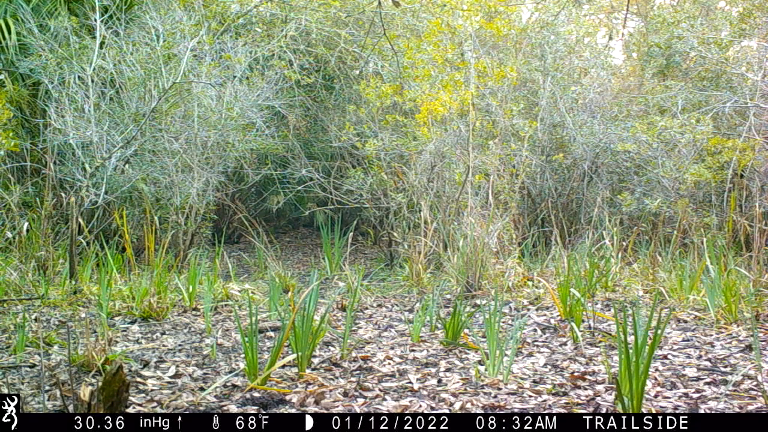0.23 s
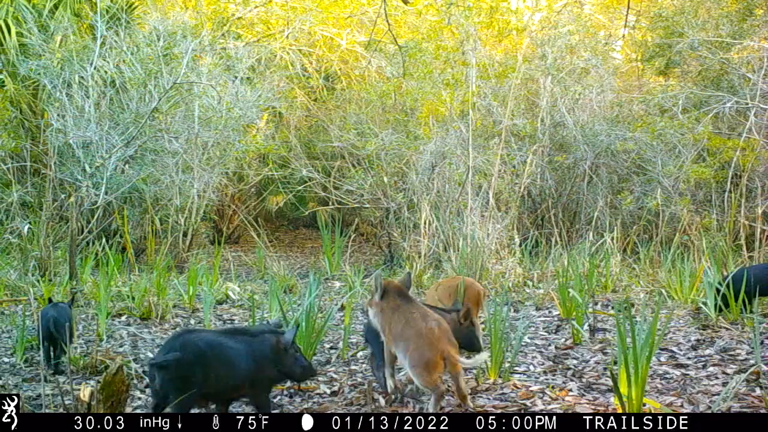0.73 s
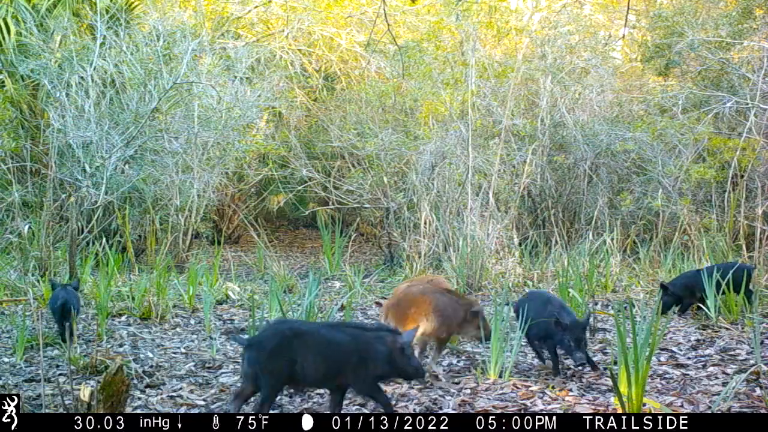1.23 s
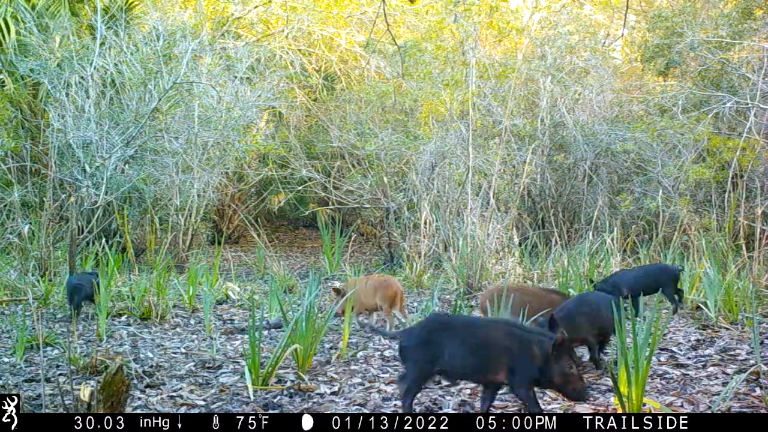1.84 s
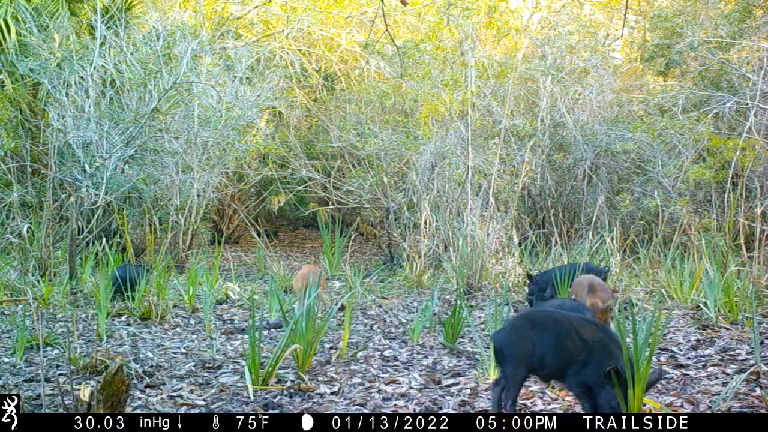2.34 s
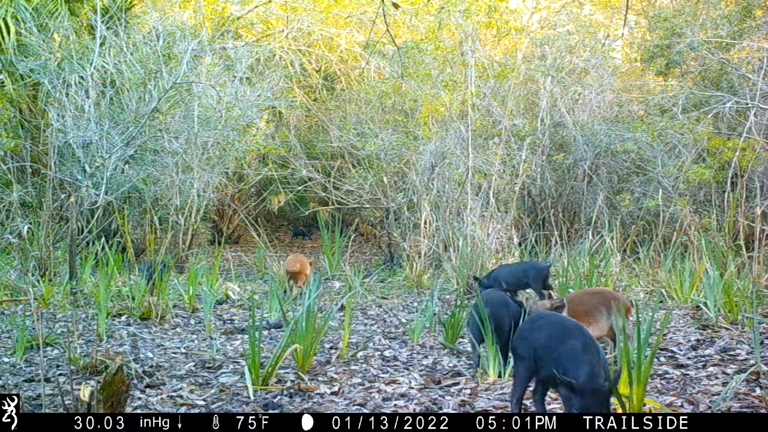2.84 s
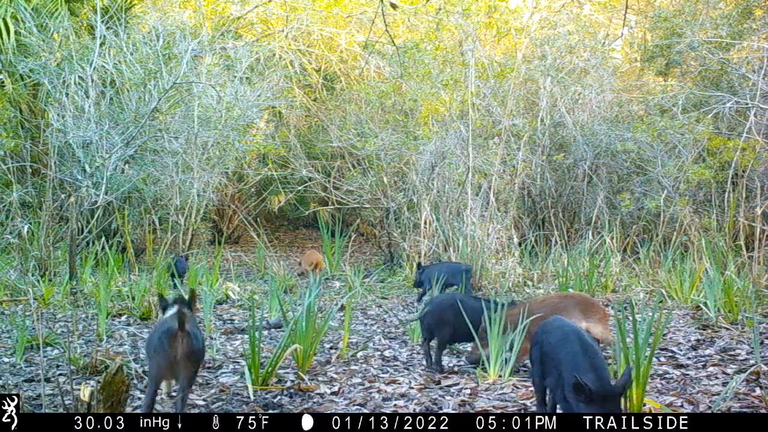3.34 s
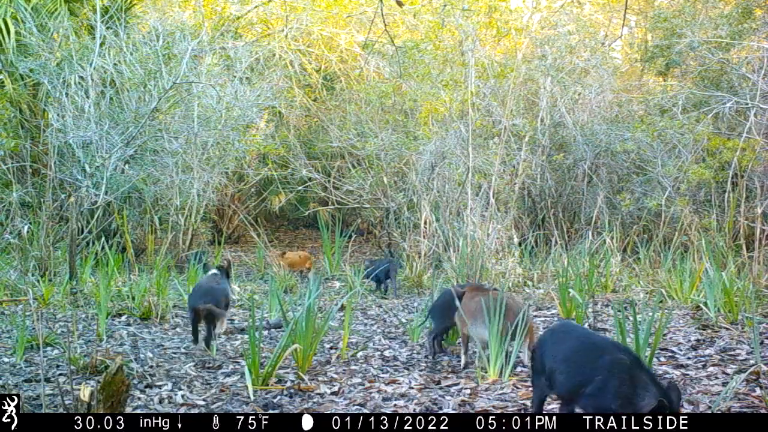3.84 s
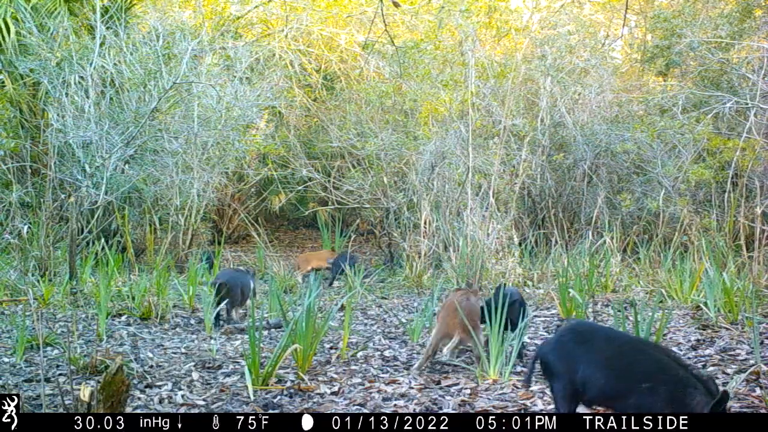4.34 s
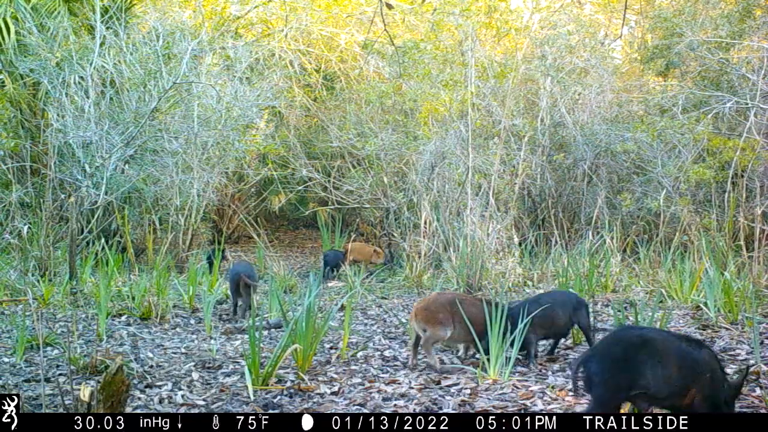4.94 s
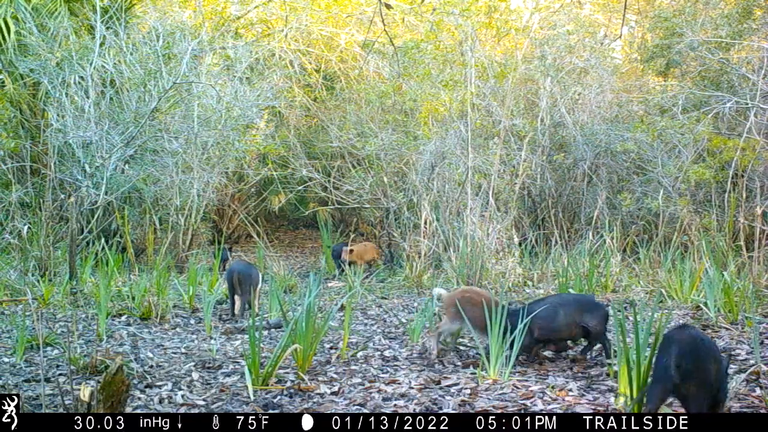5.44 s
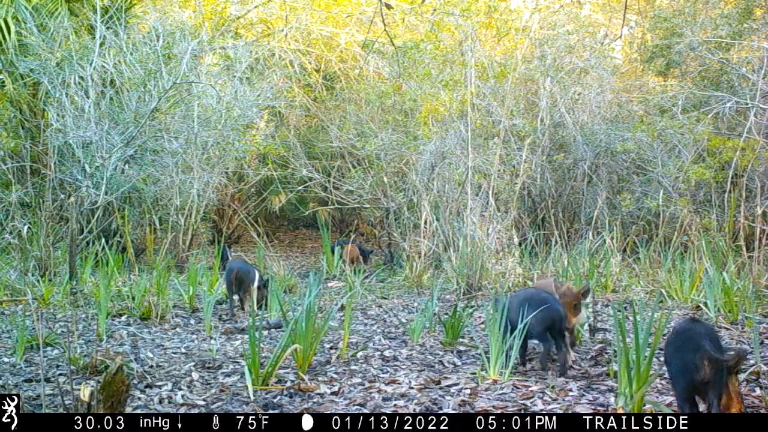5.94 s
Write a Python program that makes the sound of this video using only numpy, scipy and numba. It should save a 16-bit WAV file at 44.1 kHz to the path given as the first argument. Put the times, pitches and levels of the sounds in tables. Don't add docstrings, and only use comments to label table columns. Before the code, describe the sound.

A pig treads quickly through dry leaves, crackling and snapping twigs, with a short, soft, low grunt. An abrupt cut brings another pig's heavier crunching close by, peaking in a sharp twig snap. The steps then become softer and more distant, with small flakes breaking. Outdoors in a woodland clearing; a small boxed microphone gives a coloured, muffled mono sound with faint hiss.

```python
import sys
import numpy as np
from scipy import signal
from scipy.io import wavfile
from scipy.ndimage import uniform_filter1d
from numba import njit

SR = 44100
rng = np.random.default_rng(int(sys.argv[2]) if len(sys.argv) > 2 else 0)


def elevation(decibels):
    levels = np.asarray(decibels, float)
    return 10 ** (levels / 20)


def store_pcm(level_fs):
    pcm = np.round(np.clip(level_fs, -1, 1) * 32767).astype(np.int16)
    wavfile.write(sys.argv[1], SR, np.atleast_2d(pcm).T)


N = 273420


def evened(x):
    return x / np.sqrt(np.mean(x ** 2) + 1e-20)


def resonate(x, hz, width_hz):
    return signal.lfilter(*signal.iirpeak(hz, hz / width_hz, SR), x)


def low_passed(x, hz):
    return signal.lfilter(*signal.butter(1, hz, fs=SR), x)


def slow(points, axis, shape):
    return evened(uniform_filter1d(rng.standard_normal(shape), max(int(points), 1), axis=axis))


def thin(x, low_share):
    return x - (1 - low_share) * low_passed(x, 1800)


def strike(rows, shape):
    length = 4000
    out, t = np.zeros(N + length), np.arange(length) / SR
    for start, level_db, *pitch in rows:
        noise = rng.standard_normal(length)
        out[round(start * SR):][:length] += elevation(level_db) * shape(t, noise, *pitch)
    return out[:N]


def crackle():
    clumps = elevation(1.5 * slow(300, 0, N))
    sign = rng.choice([-1., 1.], N)
    size = elevation(3.4 * np.minimum(rng.exponential(1, N), 5)) * sign
    clicks = clumps * size * (rng.random(N) < 7000 / SR)
    kind, rings = rng.integers(0, 12, N), np.zeros(N)
    for k, hz in enumerate(np.geomspace(600, 9000, 12)):
        rings += resonate(clicks * (kind == k), hz, 0.24 * hz)
    flakes = size * (rng.random(N) < 70 / SR)
    brittle = 9 * np.diff(flakes, n=2, prepend=[0, 0]) / size.std()
    rustle = 0.75 * clumps * rng.standard_normal(N)
    return 0.1 * brittle + evened(evened(clicks) + 0.61 * evened(rings) + rustle)


# [t/s, leaf crush level/dB]
HERD_SHUFFLE = [(0, -35.5), (.2, -36), (.4, -48), (.77, -43), (.78, -33), (1.3, -33), (1.63, -35.5),
                (1.95, -35), (2.6, -31.5), (3.1, -33), (3.3, -37), (4.0, -38.5), (4.45, -42.5),
                (5.0, -38.5), (5.6, -41), (6.0, -42), (6.04, -51), (6.2, -47)]
# [start t/s, hold t/s, crush level/dB, litter depth level/dB, leaf stiffness level/dB]
LONE_TREADS = [
    (0, 0.071, -23.5, -7.5, 2),
    (.1, 0.02, -30.5, -12.5, 11.5),
    (.19, 0.023, -24.5, -10, 7.5),
    (.225, 0.055, -32.5, -8, 5),
    (.288, 0.032, -30, -13, 15),
    (.335, 0.023, -32, -5, 9.5),
    (.455, 0.039, -30, -3, 3.5),
    (.547, 0.08, -30, -6.5, 6),
    (.72, 0.075, -37.5, -1, 0),
]
# [start t/s, hold t/s, crush level/dB, depth level/dB, stiffness level/dB]
NEAR_TREADS = [(.788, 0.021, -27.5, -6.5, -8), (0.837, 0.02, -26.5, -8, 5),
               (0.885, 0.046, -25.5, 1.5, -4.5), (0.972, 0.045, -25, -7, -3), (1.157, 0.065, -21, -4, -4.5),
               (1.177, 0.079, -19, -3, -5), (1.363, 0.023, -38, -8, -9), (1.413, 0.18, -37, -5, -8),
               (1.668, 0.043, -24, -8.5, -2), (1.757, 0.097, -21.5, -4, -2),
               (1.995, 0.081, -27.5, -10.5, 5.5), (2.049, 0.082, -27, -2.5, 3.5),
               (2.194, 0.047, -28.5, -8, 4), (2.269, 0.077, -30.5, -4, -2.5),
               (2.318, 0.046, -18, -13.5, -4.5), (2.433, 0.049, -24.5, -10, 6.5),
               (2.505, 0.018, -23, -7.5, 1.5), (2.674, 0.16, -15.5, -7, 2), (2.828, 0.06, -25.5, -15, 5.5),
               (2.871, 0.044, -16.5, -7, 0), (2.937, 0.14, -28.5, -11, 9.5), (3.108, 0.057, -26, -5.5, 7),
               (3.172, 0.081, -32.5, -8, 9), (3.229, 0.045, -26.5, -7.5, 8.5)]
# [start t/s, hold t/s, crush level/dB, depth level/dB, stiffness level/dB]
FAR_TREADS = [(3.385, 0.011, -29.5, -5.5, 6), (3.434, 0.042, -29.5, -6, -1), (3.506, 0.064, -31, -2.5, 0),
              (3.57, 0.11, -37, 2, 3), (3.697, .16, -41, 1, 4), (3.995, .06, -36.5, 0, 5),
              (4.125, 0.028, -35.5, -0.5, -3), (4.196, .05, -39, -1, -1), (4.266, 0.1, -38, 1, 3),
              (4.506, 0.088, -37.5, -1, -1), (4.633, 0.083, -38, -1, -4), (4.82, 0.032, -44, -10, -4),
              (5.022, 0.051, -28, -8.5, 1), (5.08, 0.062, -40.5, -2, 6), (5.21, 0.014, -42, 9, -2),
              (5.26, 0.024, -36, -1.5, -5), (5.348, 0.018, -35, 0.5, 1.5), (5.405, 0.052, -33, -3, -2),
              (5.449, 0.024, -31, 2.5, -5), (5.507, 0.022, -35.5, -3, 4), (5.658, 0.052, -30.5, -4.5, -4),
              (5.72, 0.028, -32, -6, 0.5), (5.79, 0.046, -38.5, 7, 10), (5.883, 0.21, -41, 3, 6)]
HERD_DEPTH_DB = -0.5
PRESS_S, SETTLE_DB_PER_S = 0.0067, 331
ARCH_DB = 3.5


def treads(t):
    power = elevation(np.interp(t, *np.transpose(HERD_SHUFFLE))) ** 2
    stiff, deep = 0 * power, HERD_DEPTH_DB * power
    for rows in (LONE_TREADS, NEAR_TREADS, FAR_TREADS):
        for start, hold, crush_db, depth_db, stiff_db in rows:
            press = np.clip((t - start) / PRESS_S + 1, 0, 1)
            settle_db = SETTLE_DB_PER_S * np.maximum(t - start - hold, 0)
            lean = np.clip(2 * (t - start) / hold - 1, -1, 1)
            step = (press * elevation(crush_db - settle_db - ARCH_DB * lean ** 2)) ** 2
            power = power + step
            stiff = stiff + stiff_db * step
            deep = deep + depth_db * step
    return power, stiff / power, deep / power


STIFF_HZ, STIFF_WIDTH = 1970, 0.19
DEEP_HZ, DEEP_WIDTH = 856, 0.84


def litter():
    hz, t, z = signal.stft(crackle(), SR, nperseg=256, noverlap=192)
    power, stiff_db, deep_db = treads(t)
    patches_db = 1.5 * evened(uniform_filter1d(slow(30, 1, z.shape), 3, axis=0))
    stiff_band = np.exp(-(np.log((hz + 1) / STIFF_HZ) / STIFF_WIDTH) ** 2)
    deep_band = np.exp(-(np.log((hz + 1) / DEEP_HZ) / DEEP_WIDTH) ** 2)
    colour_db = patches_db + stiff_band[:, None] * stiff_db + deep_band[:, None] * deep_db
    leaves = signal.istft(z * elevation(colour_db), SR, nperseg=256, noverlap=192)[1][:N]
    effort = np.interp(np.arange(N) / SR, t, np.sqrt(power))
    return leaves * elevation(-3.5 + 0.7 * slow(700, 0, N)) * effort


def distant_air():
    return elevation(-43.5) * low_passed(rng.standard_normal(N), 4320)


RISE_S = 0.0013
# [t/s, peak level/dB, ring f/Hz]
TWIG_BREAKS = [(0.025, -12, 2340), (0.201, -15, 2130), (0.289, -16.5, 2110), (0.338, -17.5, 2300),
               (0.548, -31, 2260), (0.568, -20, 1950), (0.888, -25, 1280), (0.942, -19, 1420),
               (1.065, -19, 1780), (1.16, -12.5, 2540), (1.24, -14.5, 1037), (1.632, -18.5, 1900),
               (1.758, -12, 2740), (1.787, -22.5, 907), (2.022, -11, 2600), (2.124, -19.5, 1790),
               (2.196, -26, 2780), (2.497, -14.5, 2500), (2.585, -22, 2360), (2.672, -34.5, 1710),
               (2.694, -1.5, 1970), (2.75, -11, 2270), (2.876, -7, 2320), (2.988, -14.5, 2050),
               (3.11, -25.5, 1540), (3.189, -21.5, 1780), (4.339, -29, 760), (4.983, -26, 1920),
               (5.457, -22.5, 1620), (6.017, -24, 1790)]


def twigs():
    def ring(t, noise, hz):
        decay = elevation(-5 - 60 * t * hz / 20)
        wood = np.sin(2 * np.pi * hz * t) + 0.32 * noise
        return decay * wood * np.minimum(t / RISE_S, 1)
    return strike(TWIG_BREAKS, ring)


# [f/Hz, bandwidth f/Hz, level/dB]
THROAT_MODES = [
    (262, 110, 0),
    (500, 130, -18),
]
# [t/s, effort level/dB, pulse f/Hz]
GRUNT_COURSE = [
    (0.2, -52, 70),
    (0.228, -36.5, 72),
    (0.338, -36, 80),
    (0.352, -53, 80),
    (0.48, -55, 80),
]


def grunt():
    s, effort_db, hz = np.transpose(GRUNT_COURSE)
    t = np.arange(s[0], s[-1], 1 / SR)
    uneven = 1 + 0.07 * slow(400, 0, len(t))
    turns = np.cumsum(np.interp(t, s, hz) * uneven) / SR
    pulses = np.diff(np.floor(turns), prepend=0) + 0.022 * rng.standard_normal(len(t))
    throat = np.zeros(len(t))
    for f, width, db in THROAT_MODES:
        throat += elevation(db) * resonate(resonate(pulses, f, 2 * width), f, width)
    swell = elevation(np.interp(t, s, effort_db) + 2.5) * signal.windows.tukey(len(t), 0.15)
    out = np.zeros(N)
    out[round(s[0] * SR):][:len(t)] = evened(throat) * swell
    return out


# [t/s, peak level/dB]
LEAF_SNAPS = [(0.2503, -22), (0.2896, -12.5), (0.4534, -22.5), (0.5492, -11), (0.7596, -13.5), (0.791, -12),
              (0.8903, -24), (0.9707, -10.5), (1.15, -25), (1.3663, -13.5), (1.4207, -31.5),
              (1.4645, -11.5), (1.6671, -17), (1.9964, -13.5), (2.0448, -3.5), (2.4397, -3), (2.6738, -3),
              (3.059, -21.5), (3.1098, -16.5), (3.3893, -16.5), (3.4386, -15.5), (4.0972, -30.5),
              (4.128, -16.5), (4.342, -18.5), (4.6265, -42), (5.027, -24.5), (5.2614, -33), (5.4051, -22),
              (5.6371, -19), (5.7937, -22)]


def crumbles():
    def hiss(t, noise):
        decay = elevation(-13.5 - 60 * t / 0.034)
        return decay * thin(noise, 0.26) * np.minimum(t / 0.0007, 1)
    return strike(LEAF_SNAPS, hiss)


# [t/s, peak level/dB]
EDGE_TICKS = [(0.2513, -45), (0.3463, -38), (0.4964, -50), (0.7605, -40.5), (0.7866, -57), (0.8495, -35.5),
              (0.8899, -46), (0.9712, -33.5), (1.1528, -31), (1.4716, -49), (1.6686, -24), (1.7584, -28),
              (1.8063, -40.5), (2.0457, -38), (2.3047, -35), (2.3301, -35.5), (2.375, -30.5), (2.5057, -34),
              (2.6758, -26), (2.8764, -28), (2.9761, -28), (3.0565, -41), (3.1153, -30.5), (3.4471, -38.5),
              (3.5394, -41), (4.015, -52), (5.3606, -43.5), (5.4504, -41), (5.667, -43), (6.0075, -37)]


def ticks():
    def click(t, noise):
        return elevation(18) * thin((t == 0) + 0.39 * noise * elevation(-60 * t / 0.021), 0.22)
    return strike(EDGE_TICKS, click)


# [t/s, peak level/dB]
DRY_CRACKS = [(0.2897, -15), (0.4554, -20), (1.3663, -14), (1.9535, -19), (1.9964, -15), (2.2454, -19),
              (3.3897, -16), (4.0961, -20), (4.6274, -22), (4.6394, -23), (5.4031, -22), (5.5364, -25),
              (5.6101, -22), (5.6371, -20)]


def cracks():
    def click(t, noise):
        return elevation(7) * thin((t == 0) + 0.37 * noise * elevation(-60 * t / 0.0046), 0.23)
    return strike(DRY_CRACKS, click)


# [t/s, peak level/dB, ring f/Hz]
FLAKE_BREAKS = [(3.2963, -23, 3230), (3.3377, -19, 4600), (3.4176, -15.5, 4170), (3.6153, -23.5, 4330),
                (3.6513, -21.5, 4260), (3.6641, -21.5, 4140), (3.7978, -21, 4190), (3.8996, -27, 4360),
                (3.9192, -26, 4200), (4.0145, -20.5, 4240), (4.2065, -25.5, 4180), (4.4134, -32, 4200),
                (4.4375, -27, 4460), (4.5005, -23, 4270), (4.5554, -22, 4190), (4.6888, -24.5, 4160),
                (4.8211, -29.5, 4120), (4.876, -25.5, 4100), (4.984, -23, 4300), (5.1228, -29.5, 4240),
                (5.2177, -23, 3370), (5.2811, -15.5, 3910), (5.3602, -14, 4680), (5.4787, -20.5, 4100),
                (5.5662, -29, 4400), (5.667, -26, 4240), (5.6864, -18, 4200), (5.881, -26.5, 4240),
                (5.899, -26, 4230), (5.9288, -32.5, 4370)]


def flakes():
    def splinter(t, noise, hz):
        hiss = noise + 1.34 * resonate(noise, hz, 0.17 * hz)
        decay = elevation(-10.5 - 60 * t / 0.029)
        return decay * thin(hiss, 0.35) * np.minimum(t / RISE_S, 1)
    return strike(FLAKE_BREAKS, splinter)


def scene():
    breaks = twigs() + crumbles() + ticks() + cracks() + flakes()
    mono = litter() + distant_air() + grunt() + breaks
    return np.array([mono, mono])


# [f/Hz, level/dB]
PORT_RESPONSE = [(60, -30), (450, -17.5), (780, -10), (1700, -9), (2800, -9.5), (3500, -5.5), (3850, -6),
                 (4250, 0.5), (5300, -12.5), (6400, -12), (7650, -42.5), (8650, -21), (9400, -33.5),
                 (10400, -64.5)]


def port(x):
    hz = abs(np.fft.fftfreq(8192, 1 / SR))
    f, db = np.transpose(PORT_RESPONSE)
    log_gain = np.interp(np.log(hz + 1), np.log(f), db) * np.log(10) / 20
    taps = np.fft.ifft(np.exp(log_gain - 1j * signal.hilbert(log_gain).imag)).real[:4096]
    return elevation(16) * signal.oaconvolve(x, taps)[:N]


def amplifier_hum():
    dull = resonate(rng.standard_normal(N), 475, 920)
    band = signal.butter(2, [110, 3000], "bandpass", fs=SR)
    return elevation(-50.5) * evened(signal.lfilter(*band, dull))


@njit
def follow(x, slope):
    out = np.zeros(len(x))
    for i in range(1, len(x)):
        out[i] = out[i - 1] + slope * np.tanh((x[i] - out[i - 1]) / slope)
    return out


def storage(x):
    stored = follow(signal.resample_poly(x, 1, 2), 0.1)
    loudness = np.sqrt(abs(uniform_filter1d(stored ** 2, 70)))
    fuzz = rng.standard_normal(len(stored))
    bass = signal.butter(1, [45, 170], "bandpass", fs=SR / 2)
    drift = evened(signal.lfilter(*bass, fuzz))
    fuzz_gain = elevation(-24.5) * loudness ** 2.8 + elevation(-64.5)
    stored = stored + fuzz_gain * fuzz + elevation(-3) * loudness ** 1.92 * drift
    edge = signal.firwin(61, 9600, window=("kaiser", 6), fs=SR)
    return signal.oaconvolve(signal.resample_poly(stored, 2, 1)[:N], edge, "same")


CUT_S, FADE_S = 0.7712, 0.0072


def scene_change(x):
    since_cut = np.arange(N) / SR - CUT_S
    return x * np.where(since_cut < 0, 1, np.clip(0.042 + since_cut / FADE_S, 0, 1))


def low_pass(x):
    return signal.sosfilt(signal.butter(12, 10370, fs=SR, output="sos"), x)


def record(dry):
    heard = port(dry[0]) + amplifier_hum()
    mono = scene_change(storage(heard))
    return low_pass(np.array([mono, mono]))


dry = scene()
out = record(dry)
store_pcm(out)
```